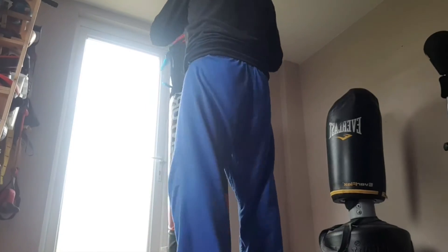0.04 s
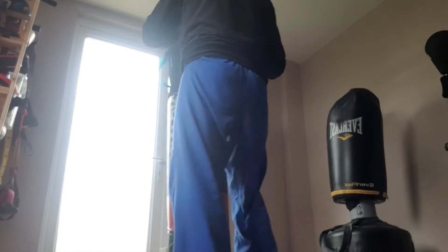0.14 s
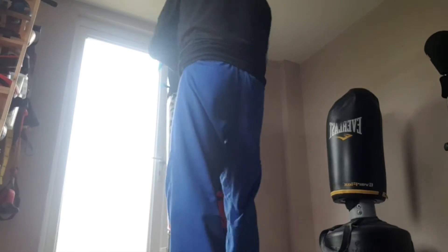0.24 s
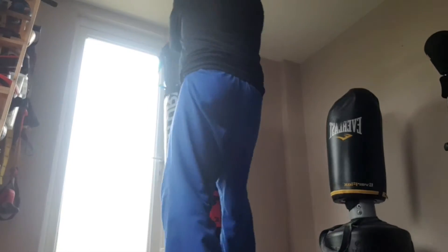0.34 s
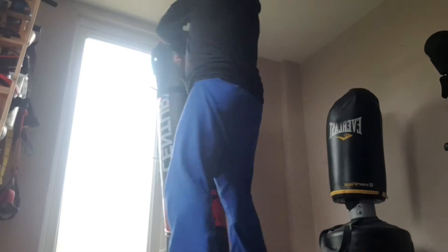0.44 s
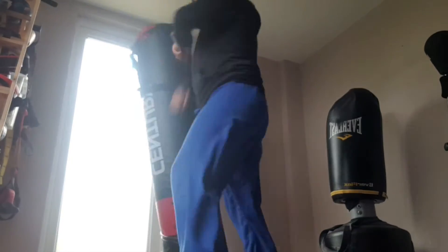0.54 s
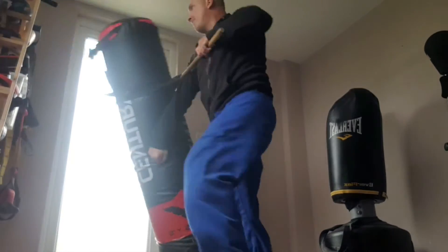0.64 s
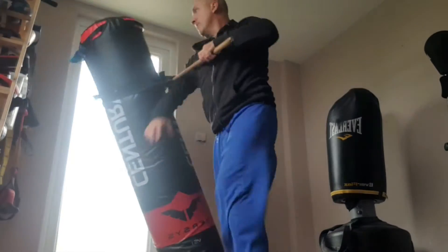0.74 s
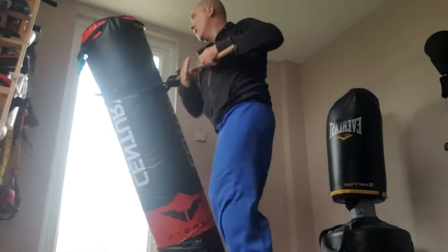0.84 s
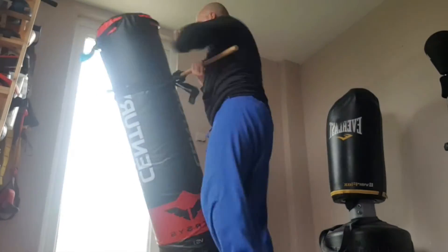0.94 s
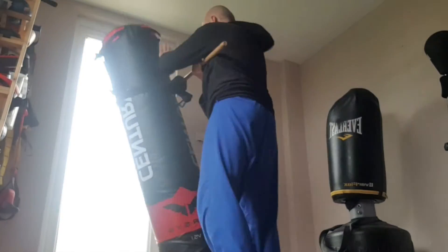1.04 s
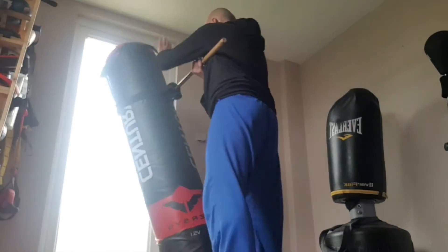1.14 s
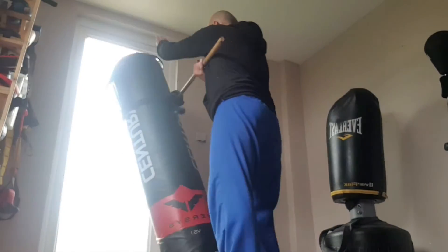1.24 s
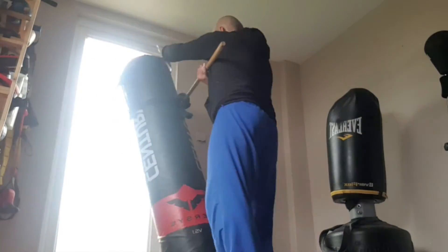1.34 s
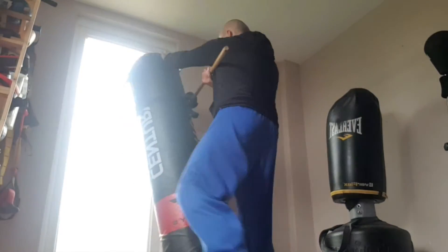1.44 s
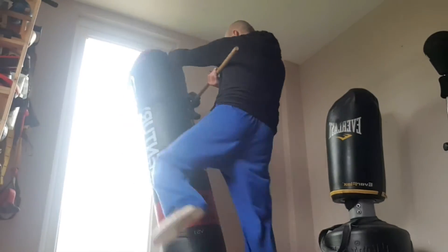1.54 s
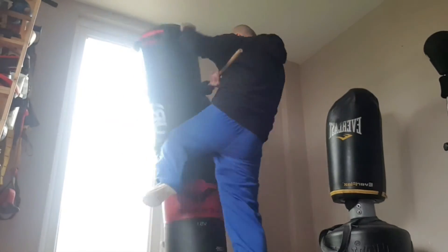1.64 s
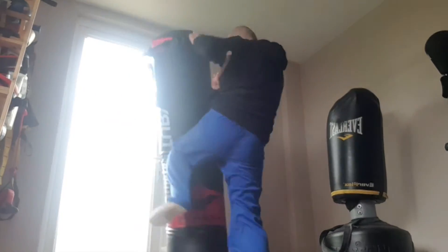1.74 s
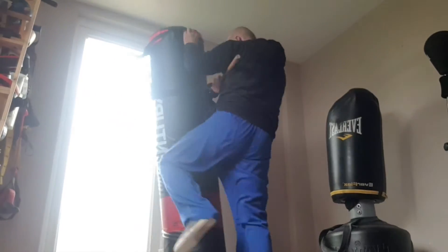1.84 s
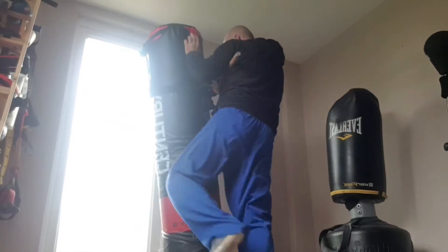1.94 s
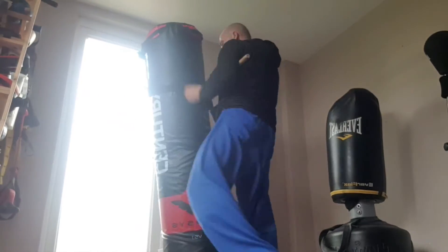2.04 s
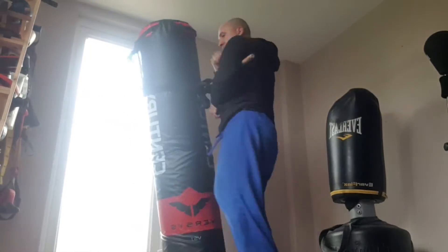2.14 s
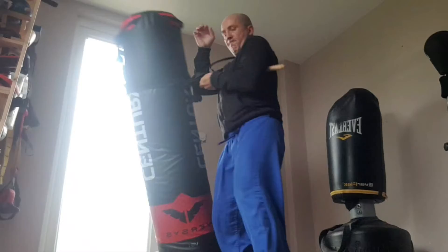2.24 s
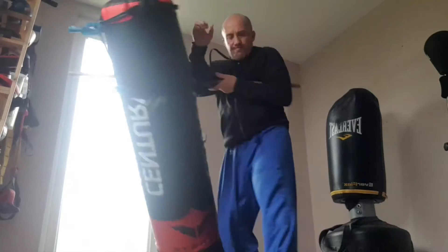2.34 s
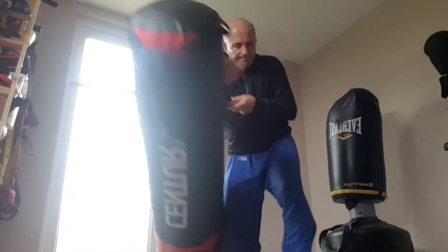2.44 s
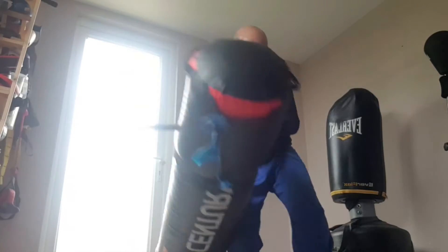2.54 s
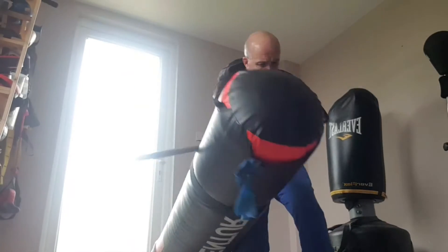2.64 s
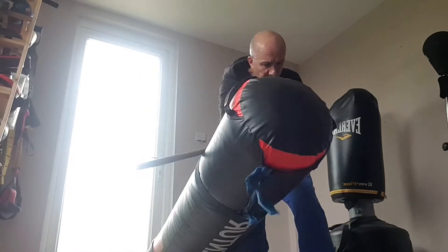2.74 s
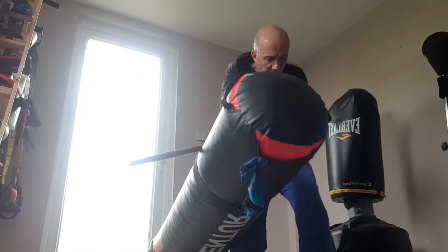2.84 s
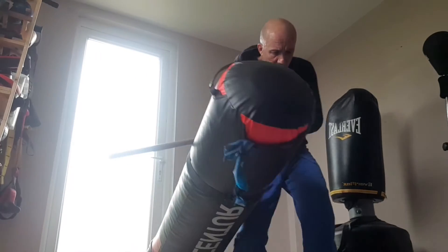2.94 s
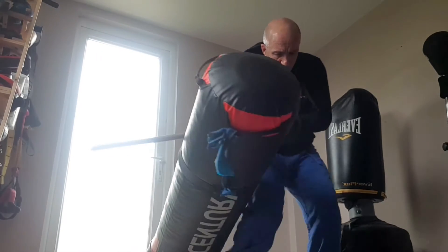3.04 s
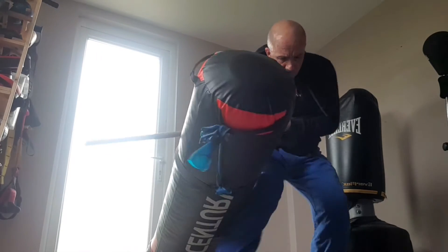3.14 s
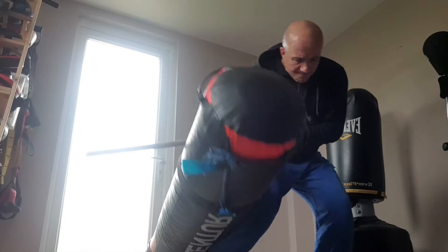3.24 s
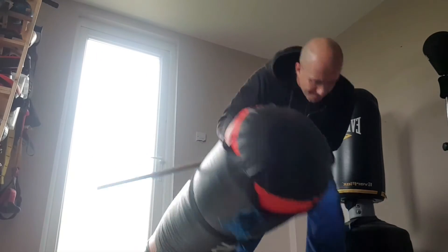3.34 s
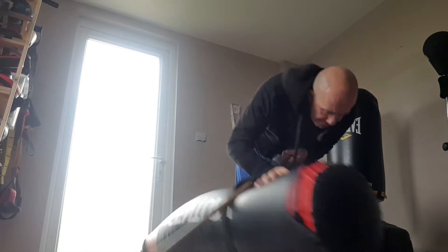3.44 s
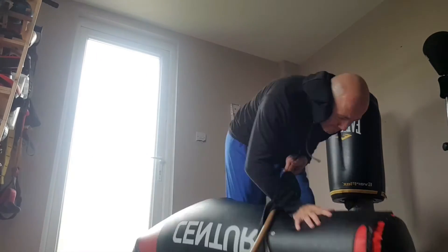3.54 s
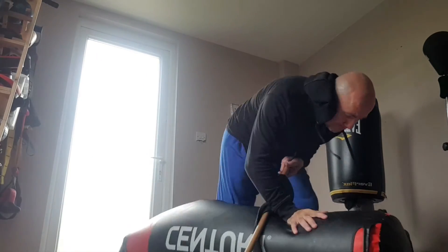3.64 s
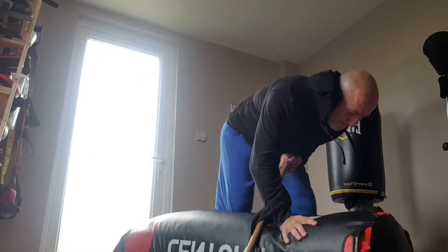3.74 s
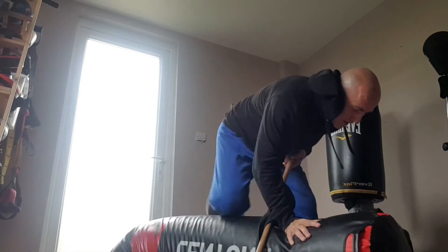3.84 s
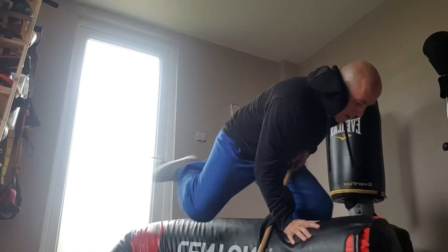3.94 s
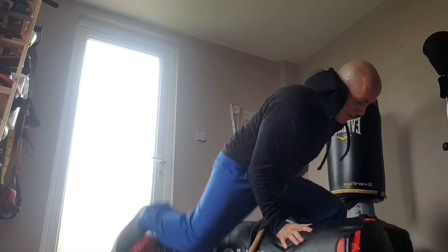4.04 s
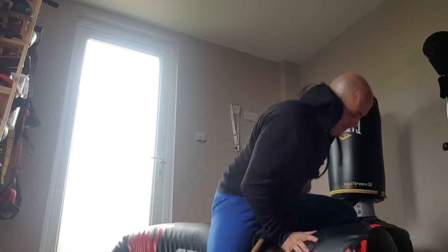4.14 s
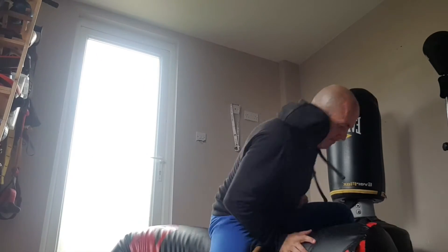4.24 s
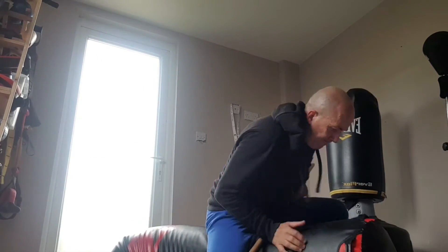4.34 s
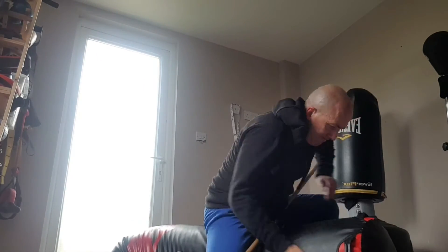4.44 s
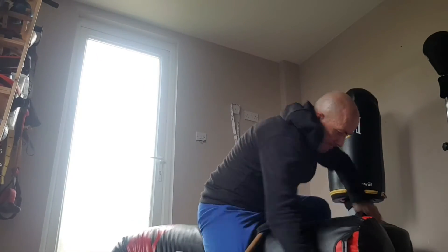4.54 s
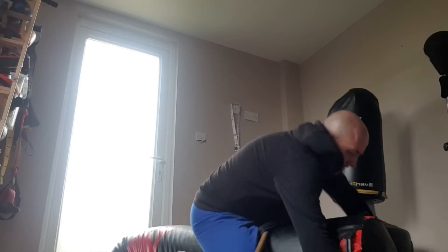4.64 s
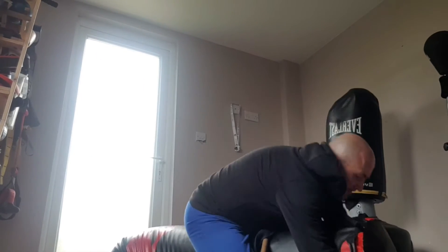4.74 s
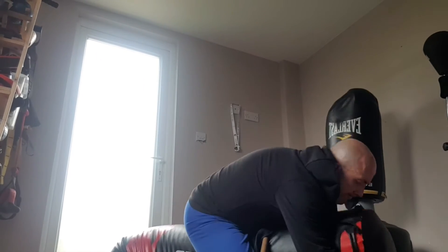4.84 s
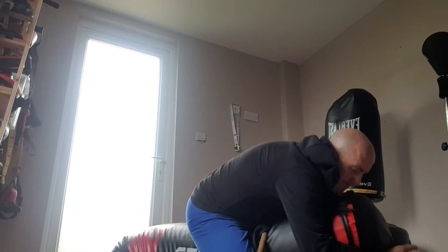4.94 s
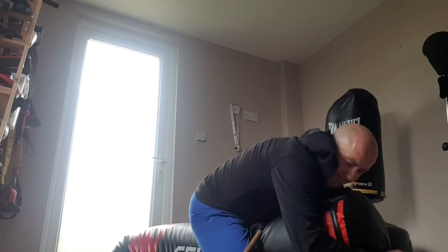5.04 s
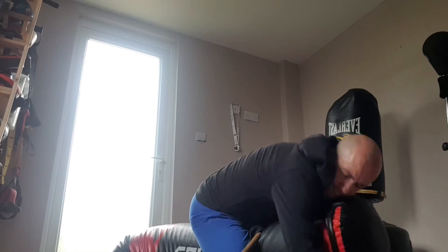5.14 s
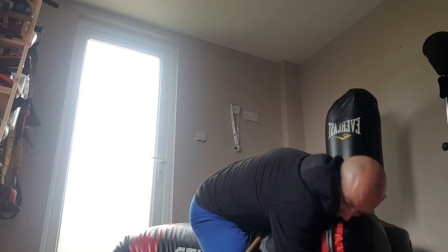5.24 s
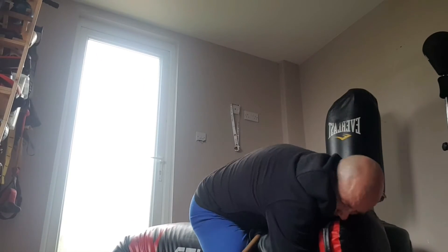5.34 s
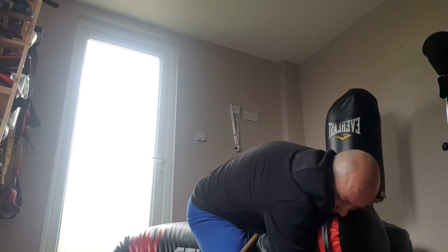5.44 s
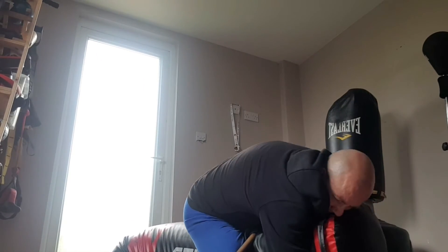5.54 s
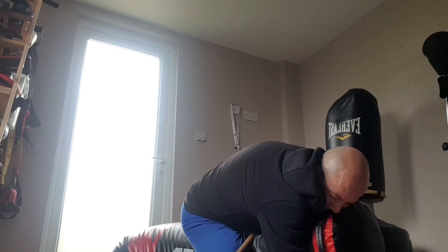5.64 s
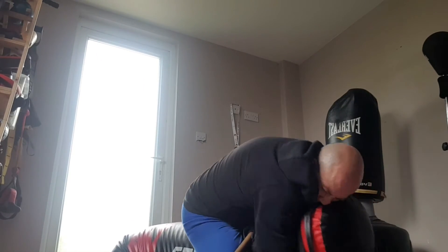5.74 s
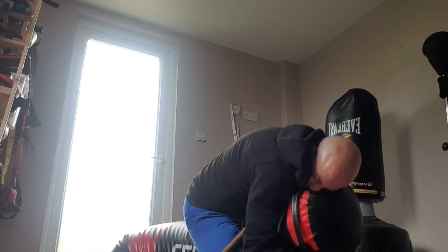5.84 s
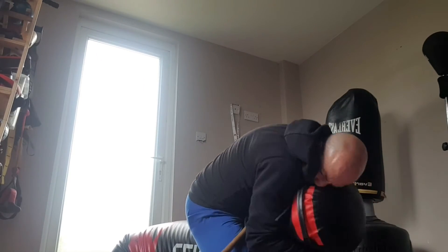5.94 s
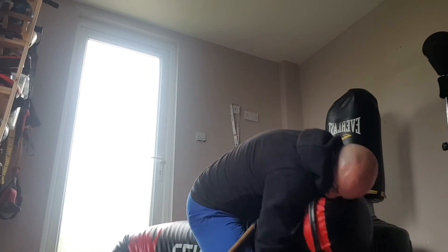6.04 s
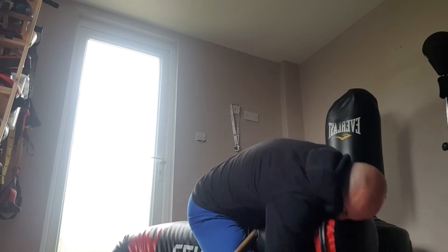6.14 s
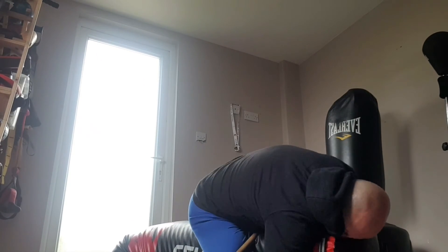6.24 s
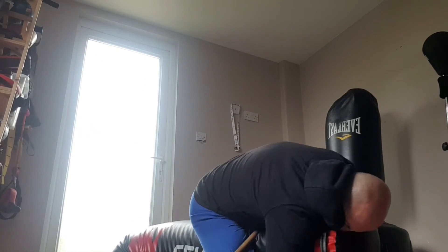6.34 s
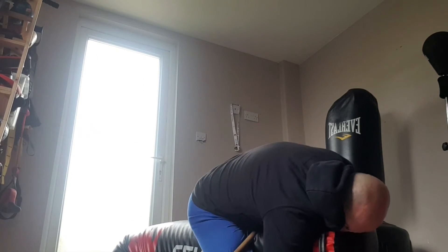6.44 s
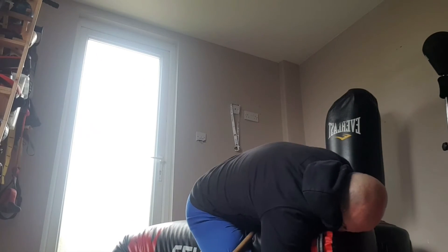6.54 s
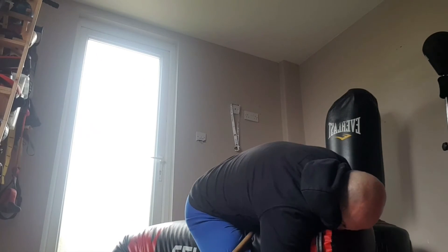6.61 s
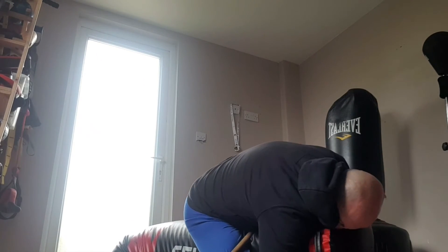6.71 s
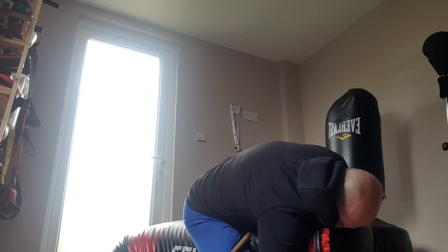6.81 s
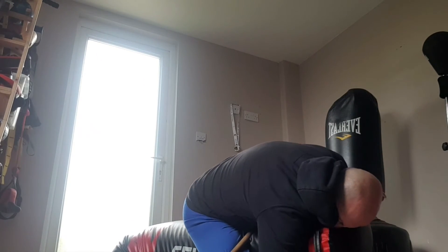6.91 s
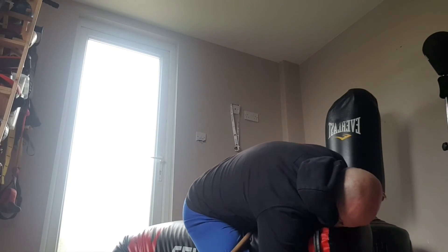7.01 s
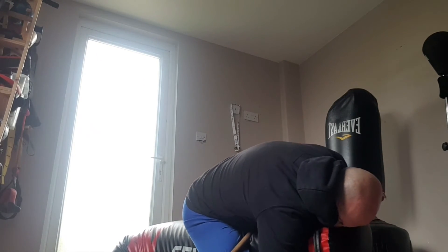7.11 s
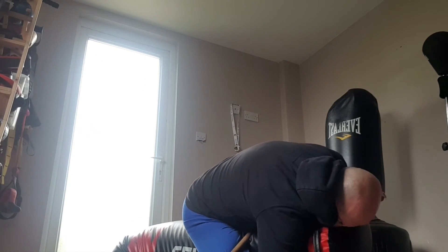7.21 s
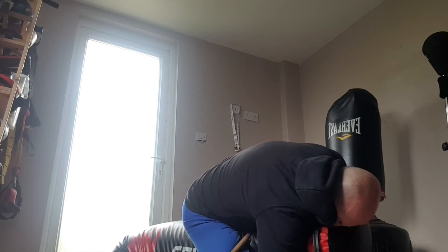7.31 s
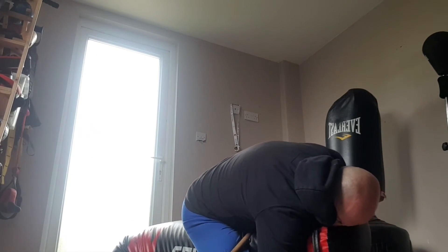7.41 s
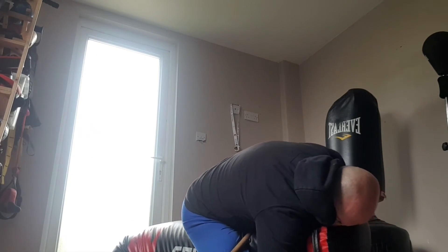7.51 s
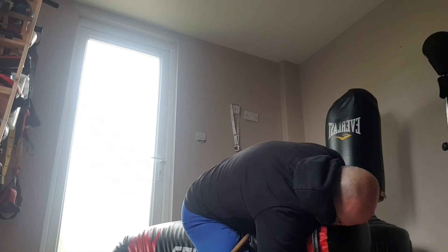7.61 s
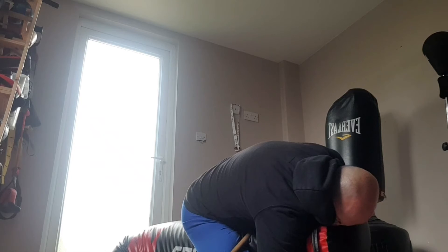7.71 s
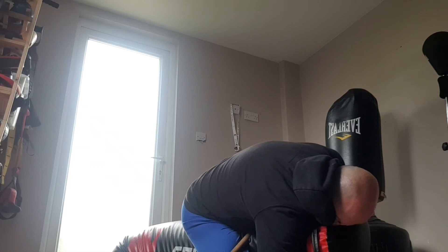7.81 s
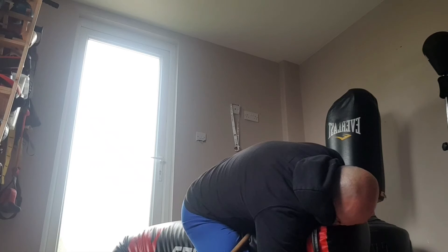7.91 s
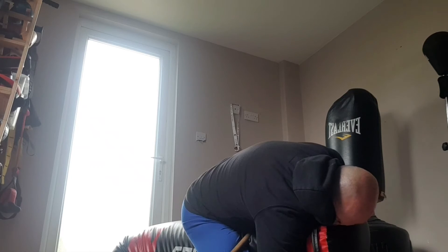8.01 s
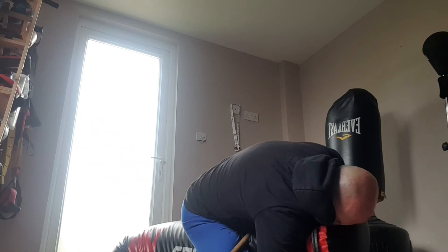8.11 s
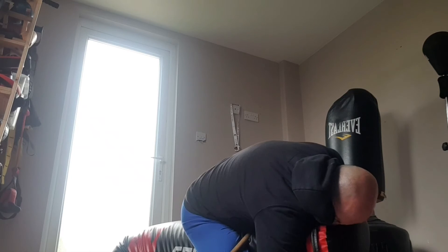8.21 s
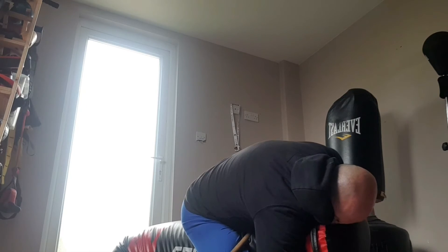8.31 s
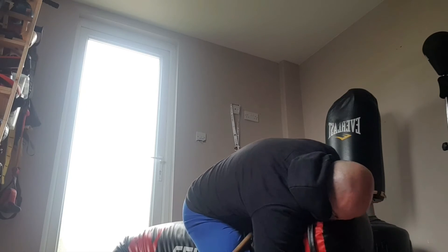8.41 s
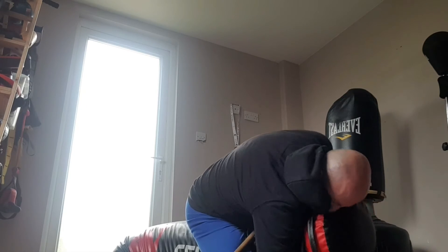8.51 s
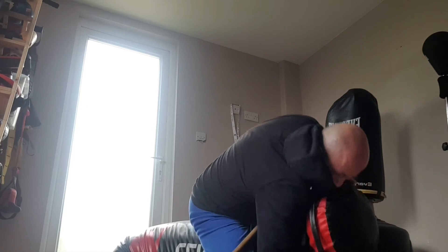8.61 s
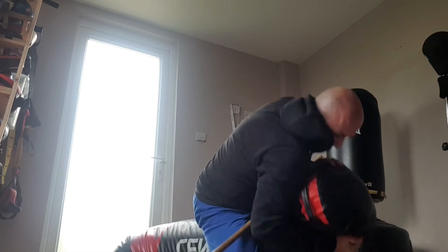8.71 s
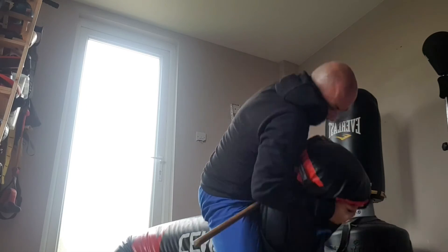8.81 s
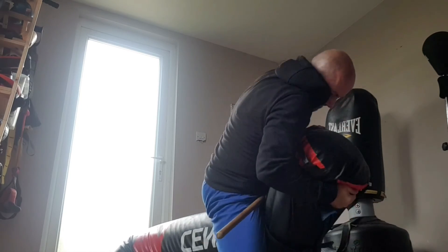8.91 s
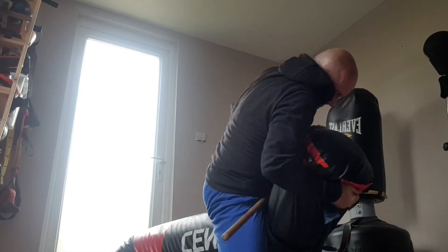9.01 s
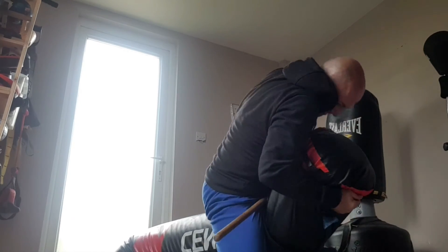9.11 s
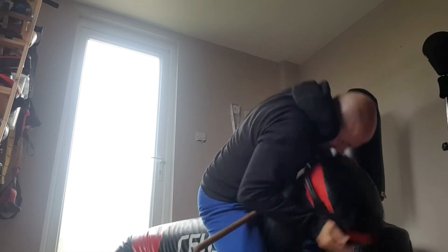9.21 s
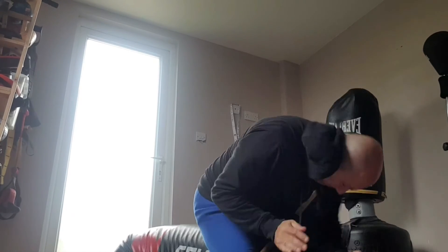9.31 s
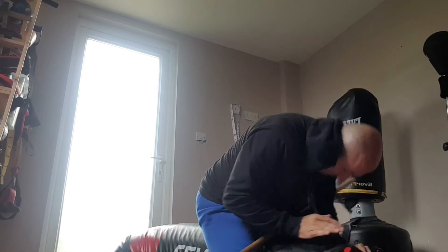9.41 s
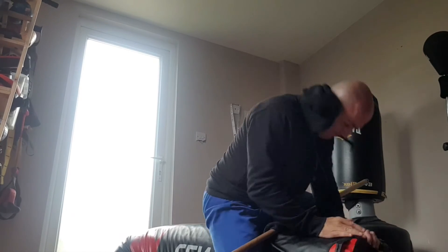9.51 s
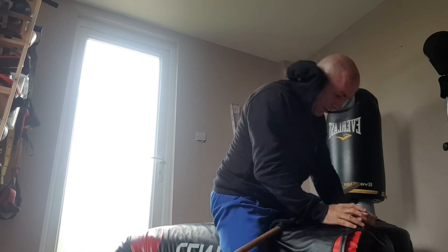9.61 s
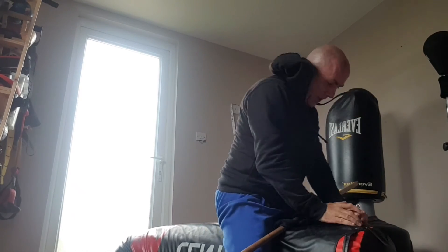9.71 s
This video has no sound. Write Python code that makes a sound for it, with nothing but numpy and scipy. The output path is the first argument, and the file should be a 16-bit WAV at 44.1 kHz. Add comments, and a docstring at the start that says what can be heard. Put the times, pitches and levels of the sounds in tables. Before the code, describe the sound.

Two or three strong blows land on a standing stuffed bag, each a deep thump with a knock and vinyl slap, ringing low in a small room. After a short metallic jangle the bag is toppled and lands heavily. Weight shifts on it with muffled grinding and fabric rustle, fades to tiny creaks, then ends in clustered loud slaps and thuds. Nearby microphone, quiet room.

```python
"""A heavy vinyl punching bag is struck, kneed, toppled and wrestled on the floor of a small, bare home gym.
Each blow is a thud, a knock and a slap of shaped, scattered noise, and sets off low decaying tones of the room.
Between blows the filling grinds and clothes swish: both are crowds of tiny random slips.
The cover creaks in dull ticks, the bag's hollow base hums, and a metal fitting jangles once in three contacts."""
import sys
import numpy as np
from scipy import signal
from scipy.fft import rfft, irfft, next_fast_len
from scipy.io import wavfile
from scipy.ndimage import uniform_filter1d, map_coordinates

SR = 44100
rng = np.random.default_rng(int(sys.argv[2]) if len(sys.argv) > 2 else 0)


def output_pcm(signal):
    """Save a mono or channel-first signal as 16-bit PCM at the path in sys.argv[1].

    Samples are clipped to [-1, 1] before scaling.
    """
    pcm = np.clip(np.atleast_2d(signal).T, -1, 1) * 32767
    wavfile.write(sys.argv[1], SR, np.round(pcm).astype(np.int16))


N = 430655  # length in samples


def amp(db):
    """Turn decibels into a gain."""
    return 10 ** (np.asarray(db) / 20)


def unit(x):
    """Scale a sound to an average (rms) level of 1."""
    return x / np.sqrt(np.mean(x ** 2) + 1e-20)


def along(points, hz):
    """Read a curve of (Hz, value) points on a log pitch axis."""
    point_hz, value = np.transpose(points)
    return np.interp(np.log(hz + 1), np.log(point_hz + 1), value)


def wobble(rate):
    """A smooth random curve with this many random points a second."""
    points = rng.standard_normal(int(N * rate / SR) + 4)
    return map_coordinates(points, [np.arange(N) * rate / SR])


def add(track, start_s, sound):
    """Mix a sound into the track, cutting off what runs past the end."""
    part = track[:, round(start_s * SR):][:, :sound.shape[-1]]
    part += sound[..., :part.shape[-1]]


def filtered(x, response):
    """Multiply each frequency of x by the gain that response gives it."""
    n = x.shape[-1]
    padded = next_fast_len(n + SR // 10, True)
    gain = response(np.fft.rfftfreq(padded, 1 / SR))
    return irfft(rfft(x, padded) * gain, padded)[..., :n]


def causal(spectrum, ring_hz=500, ring_db=0, size=4096):
    """A click with this spectrum, its energy as early as possible, lifted around one resonance."""
    hz = np.fft.rfftfreq(size, 1 / SR)
    octaves_away = np.log2((hz + 1) / ring_hz)
    lift_db = ring_db / (1 + (octaves_away / 0.17) ** 2)
    # folding the cepstrum gives the minimum-phase click
    cepstrum = irfft(np.log(amp(along(spectrum, hz) + lift_db)))
    cepstrum[1:size // 2] *= 2
    cepstrum[size // 2 + 1:] = 0
    return irfft(np.exp(rfft(cepstrum)))


# how left and right differ; deep notes are mostly more alike: pitch_hz, side_minus_mid_db
STEREO_WIDTH = [(35, -15), (80, -26.5), (170, -5), (350, -9.5), (700, -3), (1300, 0.5), (14000, -0.5)]


def diffuse(size):
    """Stereo noise as if arriving from all round the room."""
    mid, side = rng.standard_normal((2, size))
    side = filtered(side, lambda hz: amp(along(STEREO_WIDTH, hz)))
    return np.array([mid + side, mid - side])


def impact(colour, t60, room_db, room_t60, direct):
    """A push, its quick scatter and the room's swelling tail (60 dB fall times in s); rms 1 over 40 ms."""
    t = np.arange(SR * 3 // 5) / SR
    room = amp(room_db - 60 * t / room_t60) * (1 - np.exp(-t / 0.0041))
    scatter = diffuse(len(t)) * np.hypot(amp(-60 * t / t60), room)
    scatter[:, 0] += direct  # the push itself, one sample long
    sound = signal.fftconvolve(scatter, colour[None], axes=1)
    return sound / np.sqrt(np.mean(sound[:, :SR // 25] ** 2))


def friction(spectrum, slips, spread_db, t60):
    """Tiny uneven slips, on average so many a second, blurred by a fresh scatter every 1/8 s; rms 1."""
    chance, size = rng.random(N), rng.standard_normal(N)
    slips_here = chance < slips / SR
    grains = slips_here * rng.choice([-1, 1], N) * amp(spread_db * np.clip(size, -2, 2))
    out, step = np.zeros((2, N)), SR // 8
    t = np.arange(step) / SR
    for start in range(0, N, step):
        walls = diffuse(step) * amp(-60 * t / t60)
        add(out, start / SR, signal.fftconvolve(grains[None, start:start + step], walls, axes=1))
    return unit(filtered(out, lambda hz: amp(along(spectrum, hz))))


def even(x, seconds):
    """Keep the fine grain of a noise but hold its slow level near 1."""
    slow_power = uniform_filter1d(np.mean(x ** 2, 0), int(seconds * SR))
    return x / np.sqrt(np.abs(slow_power) + 1e-6)


SWELL_DB = 20.5  # a movement starts this far under its full level


def stroke(start, rise, hold, sag, release):
    """Gain of one movement: it swells, sags while it lasts, then dies away (both in dB a second)."""
    t = np.arange(N) / SR - start
    swell_db = SWELL_DB * np.maximum(1 - t / rise, 0) ** 2
    fall_db = sag * np.maximum(t - rise, 0) + release * np.maximum(t - rise - hold, 0)
    return amp(-np.minimum(swell_db + fall_db, 200))


def strokes(rows, sag, release):
    """One gain curve for each level column; overlapping movements add in power."""
    rows = np.array(rows)
    shapes = np.array([stroke(start, rise, hold, sag, release) for start, rise, hold in rows[:, :3]])
    return np.sqrt(amp(rows[:, 3:].T) ** 2 @ shapes ** 2)


# colour of the quiet room: pitch_hz, relative_level_db
STILL_COLOUR = [(25, -7), (75, 4), (150, -10), (400, -3), (900, -13.5), (2000, -23), (8000, -28),
                (14500, -24)]


def still_room():
    """The quiet of the room is a faint, steady, coloured noise."""
    return amp(-66.5) * unit(filtered(diffuse(N), lambda hz: amp(along(STILL_COLOUR, hz))))


# cloth slides over vinyl: start_s, rise_s, hold_s, swish_db, hiss_db
SLIDES = [(0.02, 0.051, 0.011, -57, -52.5), (0.155, 0.025, 0.0045, -43.5, -44),
          (0.32, 0.028, 0.05, -41.5, -49.5), (0.48, 0.043, 0.12, -42, -44.5),
          (0.63, 0.069, 0.036, -34, -35), (0.9, .07, 0.027, -51.5, -55), (1.025, 0.038, 0.01, -26, -25.5),
          (1.22, 0.35, .3, -53.5, -58.5), (1.675, 0.11, 0.017, -33, -32.5), (2.06, 0.11, 0.036, -49, -53.5),
          (2.23, 0.086, 0.53, -47.5, -47), (2.55, 0.012, 0.12, -41, -35.5), (2.9, 0.11, 0.032, -47.5, -44),
          (3.08, 0.086, 0.12, -53.5, -56.5), (3.26, 0.14, 0.3, -45.5, -48),
          (3.48, 0.14, 0.13, -38.5, -35.5), (3.78, 0.048, 0.46, -47.5, -49.5),
          (4.17, 0.02, 0.17, -42.5, -42.5), (4.5, 0.2, 0.12, -46, -47), (4.89, .11, 0.025, -45.5, -43.5),
          (5.14, 0.1, 0.049, -49.5, -51.5), (5.42, .1, 0.037, -58.5, -57.5), (5.64, 0.043, .08, -61.5, -59),
          (5.79, 0.12, 0.12, -36, -31), (6.08, 0.05, 0.3, -46, -52.5), (6.42, 0.2, 0.95, -56.5, -61.5),
          (7.5, 0.155, 0.16, -71.5, -71), (8.06, 0.043, 0.0086, -68, -72.5), (8.35, 0.18, .5, -47, -47.5),
          (8.76, 0.11, 0.093, -41.5, -56), (9.14, 0.083, .08, -45, -47), (9.25, 0.15, 0.0068, -24, -28.5),
          (9.56, 0.092, .08, -57, -56)]
# trouser fabric zips: start_s, rise_s, hold_s, level_db
ZIPS = [(0.64, 0.088, .02, -43), (1.69, 0.065, 0.026, -34), (8.78, 0.1, .08, -45), (9.3, 0.077, .03, -28)]
# colours of the swish, the finer hiss and the zip: pitch_hz, relative_level_db
SWISH_COLOUR = [(300, -10), (800, 3), (1300, 1.5), (1900, -0.5), (2700, 2), (3700, 1.5), (4900, -0.5),
                (6500, -6), (8400, -17.5), (12000, -29.5)]
HISS_COLOUR = [(350, -3.5), (750, -5.5), (1300, -3), (1900, -2), (2700, -7.5), (4500, -3), (7000, -5),
               (8400, -13), (10000, -7.5), (12500, -3.5), (14500, -11)]
ZIP_COLOUR = [(1500, -40), (3000, -9), (4000, -0.5), (5100, 1), (6300, -14), (9000, -33)]
SLIDE_SAG_DB_PER_S, SLIDE_RELEASE_DB_PER_S = 10, 105


def clothes():
    """Cloth on vinyl slips in tiny steps: a swish, a finer hiss and a narrow zip from the trousers."""
    swish_gain, hiss_gain = strokes(SLIDES, SLIDE_SAG_DB_PER_S, SLIDE_RELEASE_DB_PER_S)
    zip_gain, = strokes(ZIPS, SLIDE_SAG_DB_PER_S, SLIDE_RELEASE_DB_PER_S)
    swish = friction(SWISH_COLOUR, slips=2500, spread_db=8, t60=0.11)
    hiss = friction(HISS_COLOUR, slips=5000, spread_db=3.5, t60=0.11)
    zipping = friction(ZIP_COLOUR, slips=4000, spread_db=3.5, t60=0.1)
    flicker = amp(0.46 * wobble(40))  # the level trembles slightly
    return flicker * (swish_gain * swish + hiss_gain * hiss + zip_gain * zipping)


# small slips of the loaded cover: start_s, level_db
CREAKS = [(0.178, -51), (4.772, -46.5), (6.184, -46), (6.777, -56), (6.943, -55), (7.057, -52),
          (7.563, -53), (7.716, -55), (7.813, -60.5), (7.927, -67), (8.076, -63), (8.177, -67.5),
          (8.346, -58.5), (8.374, -44), (8.851, -43)]
# colour of one creak: pitch_hz, relative_level_db
CREAK_COLOUR = [(80, -28), (250, -6.5), (600, 6), (1000, 0), (1700, -2.5), (2500, -22.5), (6000, -24),
                (14000, -56)]
CREAK_HZ, CREAK_SPREAD_OCTAVES = 480, 0.2


def creaks():
    """The stretched cover lets go in single dull ticks, each at a chance pitch."""
    out = np.zeros((2, N))
    for (start_s, level_db), chance in zip(CREAKS, rng.standard_normal(len(CREAKS))):
        pitch_hz = CREAK_HZ * 2 ** (CREAK_SPREAD_OCTAVES * chance)
        colour = causal(CREAK_COLOUR, pitch_hz, ring_db=7)
        add(out, start_s, amp(level_db) * impact(colour, t60=0.035, room_db=-11, room_t60=0.35, direct=8))
    return out


# contacts of the metal fitting: start_s, level_db
CLINKS = [(2.566, -41.5), (2.574, -29.5), (2.582, -31)]
# ringing notes of the metal: pitch_hz, relative_level_db, fall_by_60_db_s
METAL_NOTES = [(4317, 1.5, 0.44), (4720, -1, 0.15), (8640, -12, 0.23), (11900, -12.5, 0.33),
               (13320, -17.5, 0.26)]


def clink():
    """A metal fitting scrapes and jangles; the room blurs each note into a narrow, fading band."""
    out, t = np.zeros((2, N)), np.arange(SR // 2) / SR
    for start_s, level_db in CLINKS:
        scrape = unit(filtered(diffuse(len(t)), lambda hz: hz > 2500))
        add(out, start_s, amp(level_db - 4.0 - 60 * t / 0.085) * scrape)
        for note_hz, note_db, t60 in METAL_NOTES:
            ring = unit(filtered(diffuse(len(t)), lambda hz: 1 / (1 + ((hz - note_hz) / 100) ** 2)))
            add(out, start_s, amp(level_db + note_db - 60 * t / t60) * ring)
    return out


# the body's weight moves on the filling: start_s, rise_s, hold_s, rumble_db, rub_db
SHIFTS = [(0.1, 0.073, .02, -60, -52), (0.5, 0.17, 0.13, -27.5, -41.5), (1.44, 0.12, .5, -38, -45.5),
          (1.7, 0.1, 0.059, -37.5, -37.5), (2.266, 0.017, 0.015, -25, -44), (2.33, 0.078, 0.33, -35, -37),
          (2.86, 0.22, 0.058, -44.5, -47), (3.2, 0.2, 0.017, -38.5, -38.5), (3.5, 0.12, 0.42, -35.5, -37),
          (4.1, 0.054, 0.31, -40, -41), (4.48, 0.3, 0.22, -38.5, -41), (5.12, 0.12, 0.13, -41, -43.5),
          (5.44, 0.068, 0.022, -51, -46), (5.66, 0.069, 0.31, -42.5, -39), (6.12, 0.063, 0.2, -52, -44),
          (6.38, 0.13, 1, -60.5, -51.5), (7.5, 0.083, 0.25, -62, -63), (8.35, 0.14, 0.48, -30.5, -36),
          (9.17, 0.062, .03, -38, -38), (9.26, 0.034, 0.089, -24, -28), (9.5, 0.1, .15, -39, -50.5)]
# colours of the deep rumble and the rub: pitch_hz, relative_level_db
RUMBLE_COLOUR = [(20, -20), (42, -13.5), (62, -0.5), (79, 2.5), (100, -8), (135, -15), (220, -16.5),
                 (600, -99)]
RUB_COLOUR = [(70, -34), (150, -2.5), (220, -5.5), (330, -3.5), (460, -5.5), (800, -9.5), (1150, -19),
              (1900, -21), (3500, -33), (9000, -63.5)]
SHIFT_SAG_DB_PER_S, SHIFT_RELEASE_DB_PER_S = 2, 81


def filling():
    """Packed stuffing grinds and rumbles in tiny slips as the weight on it moves."""
    rumble_gain, rub_gain = strokes(SHIFTS, SHIFT_SAG_DB_PER_S, SHIFT_RELEASE_DB_PER_S)
    rumble = even(friction(RUMBLE_COLOUR, slips=550, spread_db=-0.5, t60=0.11), seconds=0.11)
    rub = even(friction(RUB_COLOUR, slips=320, spread_db=4.0, t60=0.17), seconds=0.13)
    return rumble_gain * rumble + rub_gain * rub


# the foot of the tipping bag bumps: start_s, level_db
ROCKS = [(0.348, -21), (0.425, -15.5), (2.267, -31), (2.498, -32)]
# notes of the hollow base: pitch_hz, relative_level_db, fall_by_60_db_s
BASE_NOTES = [(156.4, 0.5, 0.37), (182.6, -9, 0.11)]


def rocking():
    """The foot of the tipping bag bumps and its hollow base rings in fading tones."""
    out, t = np.zeros((2, N)), np.arange(SR) / SR
    hum = sum(amp(db - 60 * t / t60) * np.sin(2 * np.pi * hz * t) for hz, db, t60 in BASE_NOTES)
    soft_start = 1 - np.exp(-t / 0.008)
    for start_s, level_db in ROCKS:
        add(out, start_s, amp(level_db) * soft_start * hum)
    return out


# low standing waves of room and floor:
# pitch_hz, fall_by_60_db_s, build_up_s, upright_bag_db, lying_bag_db
ROOM_MODES = [(50.17, 0.87, 0.014, 1, -12.5), (81, 0.65, 0.012, -9, 0), (162.3, 0.41, 0.022, -11.5, -7.5)]
TOPPLED_S = 3.4  # from here on the bag lies on the floor


def boom():
    """Standing waves build up and hum on: mostly the lowest while the bag stands, the second once it lies."""
    out, t = np.zeros((2, N)), np.arange(SR) / SR
    for hz, t60, rise, upright_db, lying_db in ROOM_MODES:
        wave = np.sin(2 * np.pi * hz * t) * amp(-60 * t / t60) * (1 - np.exp(-t / rise))
        wave = wave / np.abs(wave).max()
        for start_s, _, _, _, boom_db, _ in BLOWS:
            mode_db = upright_db if start_s < TOPPLED_S else lying_db
            add(out, start_s, amp(boom_db + mode_db) * wave)
    return out


# blows on bag and floor, also heard in boom():
# start_s, thud_db, knock_db, slap_db, boom_db, hollow_note_hz
BLOWS = [(0.038, -46, -52.5, -64.5, -56, 374), (0.341, -28, -33.5, -46, -17, 187),
         (0.522, -32, -30.5, -63.5, -29, 585), (0.618, -28.5, -36, -50, -37, 484),
         (0.666, -14.5, -21.5, -28.5, -14.5, 330), (0.906, -33, -30, -43.5, -40, 580),
         (1.052, -15, -14.5, -19.5, -12.5, 306), (1.673, -23, -22.5, -28.5, -22.5, 720),
         (1.743, -26.5, -49, -48.5, -21.5, 322), (2.123, -41, -51, -60.5, -36, 367),
         (2.175, -36.5, -39, -49.5, -51, 463), (2.266, -32, -38, -52, -36, 184),
         (2.98, -42.5, -44.5, -49.5, -52, 640), (3.61, -12.5, -18.5, -27.5, -18.5, 215),
         (4.194, -29, -27.5, -28.5, -35, 380), (4.262, -26, -42, -43, -28.5, 210),
         (4.651, -38, -51, -67, -48, 257), (4.851, -36.5, -45, -51.5, -31, 190),
         (5.001, -33.5, -38, -58.5, -38, 364), (5.247, -35, -38, -53, -40, 387),
         (5.719, -36.5, -57, -63, -39, 330), (6.276, -19, -39, -42, -22, 222),
         (8.513, -35, -37, -50, -30.5, 330), (9.003, -36, -40, -52.5, -32.5, 590),
         (9.249, -43, -36.5, -46, -40, 400), (9.272, -24, -22, -31, -17, 275),
         (9.338, -20.5, -16, -22.5, -12.5, 900), (9.358, -15.5, -18, -20, -50, 870)]
# colours of the three parts of a blow: pitch_hz, relative_level_db
THUD_COLOUR = [(25, -29), (60, -7.5), (110, 2), (170, -3.5), (230, 2), (320, -1.5), (450, -12.5),
               (800, -32), (2000, -103.5)]
KNOCK_COLOUR = [(150, -31.5), (320, -0.5), (470, 2), (660, 0), (840, -2.5), (1050, -11.5), (1600, -28.5),
                (4000, -68)]
SLAP_COLOUR = [(500, -27), (1000, 5), (1400, 8), (1900, 5.5), (2700, -1.5), (5000, -10), (8400, -30.5),
               (12500, -15), (14500, -13.5)]


def blows():
    """The filling thuds, the floor knocks, the vinyl slaps; each blow has its own hollow note."""
    out = np.zeros((2, N))
    slap = causal(SLAP_COLOUR)
    lead = SR // 70  # samples of brushing before a blow
    for start_s, thud_db, knock_db, slap_db, _, note_hz in BLOWS:
        thud = causal(THUD_COLOUR, note_hz, ring_db=3.5)
        knock = causal(KNOCK_COLOUR, note_hz, ring_db=8.5)
        add(out, start_s, amp(thud_db) * impact(thud, t60=0.22, room_db=-0.5, room_t60=0.4, direct=15))
        add(out, start_s, amp(knock_db) * impact(knock, t60=0.035, room_db=-3.0, room_t60=0.42, direct=10))
        add(out, start_s, amp(slap_db) * impact(slap, t60=0.037, room_db=-2.5, room_t60=0.29, direct=8.9))
        # the loose cover is brushed just before the weight lands
        brush = unit(signal.fftconvolve(diffuse(lead), slap[None], axes=1)[:, :lead])
        add(out, start_s - lead / SR, amp(slap_db - 12.5) * np.linspace(0, 1, lead) * brush)
    return out


def scene():
    """Everything together, over the quiet of the room."""
    background = still_room() + clothes() + creaks() + clink()
    return background + filling() + rocking() + boom() + blows()


TOP_HZ = 14750


def record(dry):
    """Round off the highest peaks, then keep nothing above the top frequency."""
    rounded = dry / (1 + np.abs(dry / 0.95) ** 6) ** (1 / 6)
    return filtered(rounded, lambda hz: hz < TOP_HZ)


dry = scene()
out = record(dry)
output_pcm(out)
```